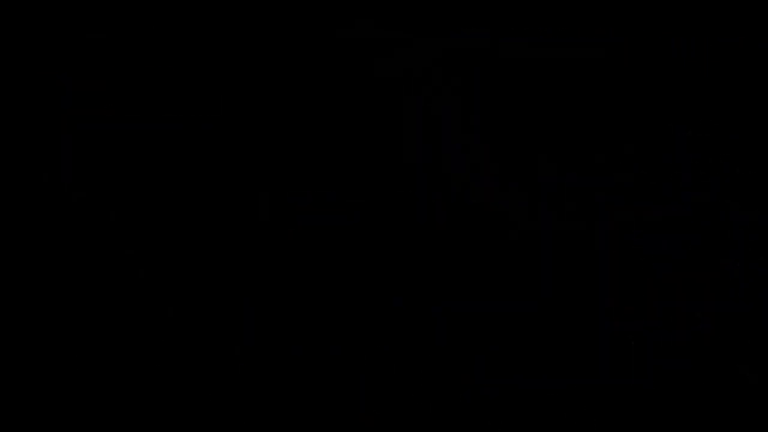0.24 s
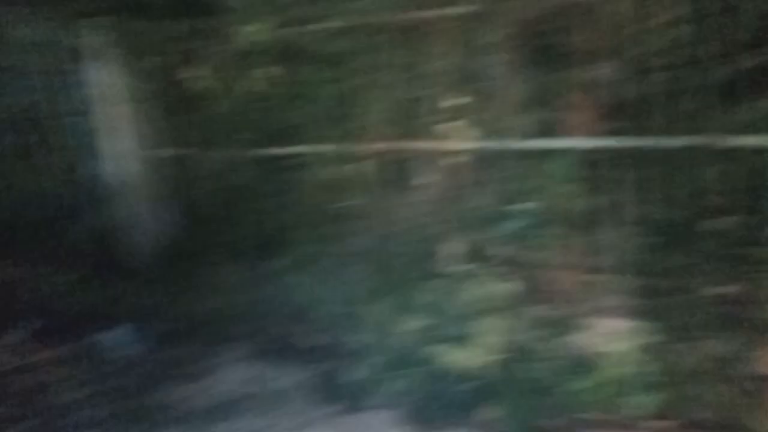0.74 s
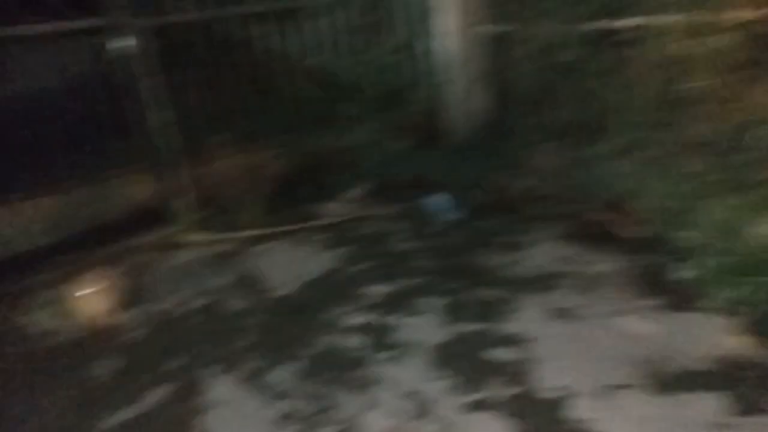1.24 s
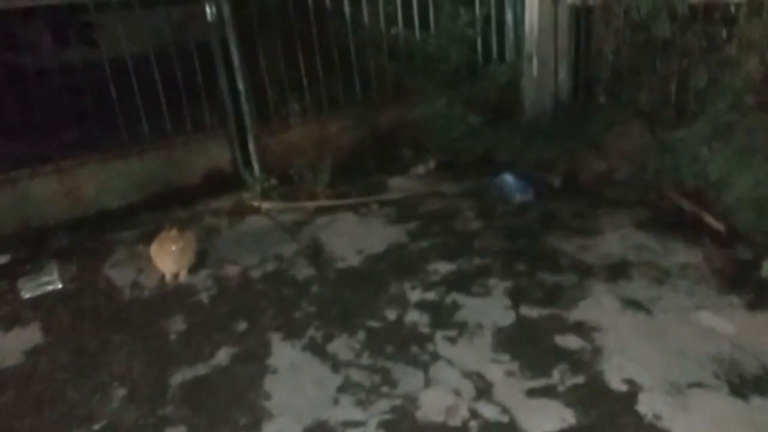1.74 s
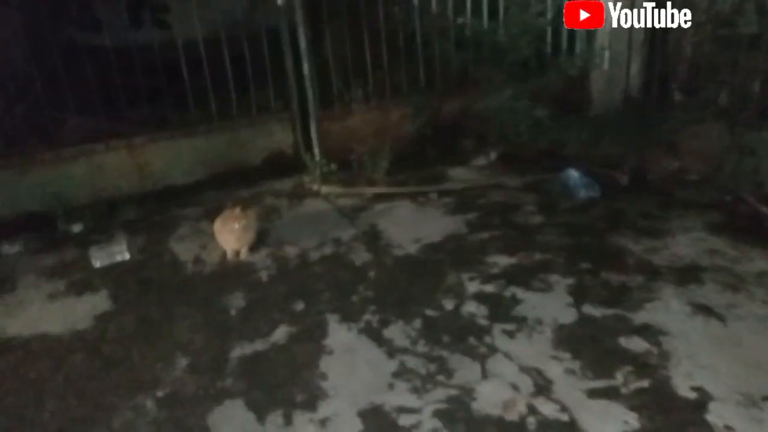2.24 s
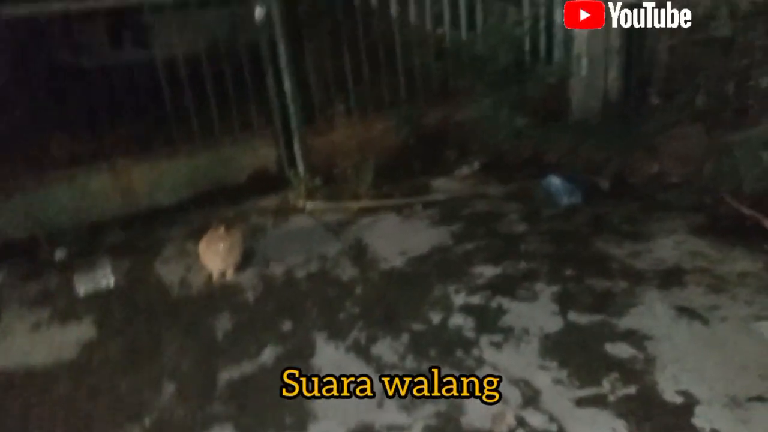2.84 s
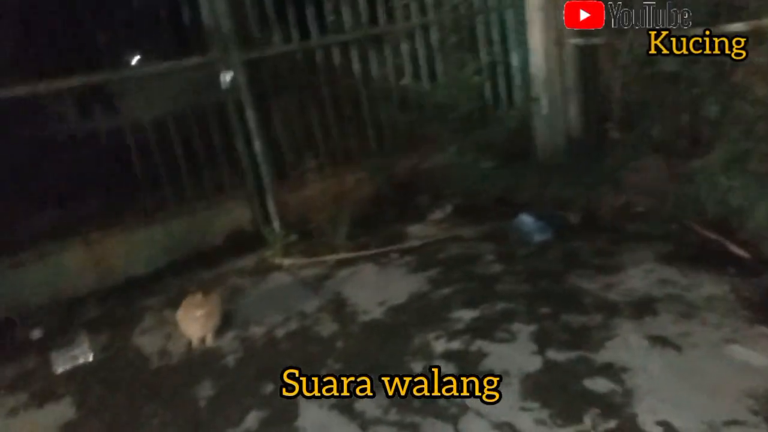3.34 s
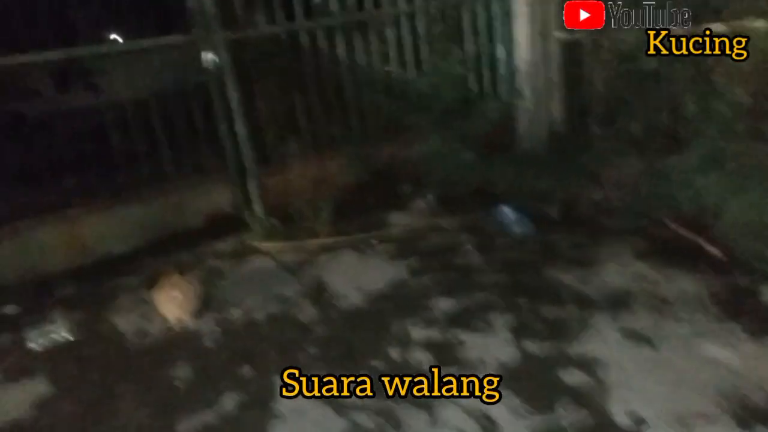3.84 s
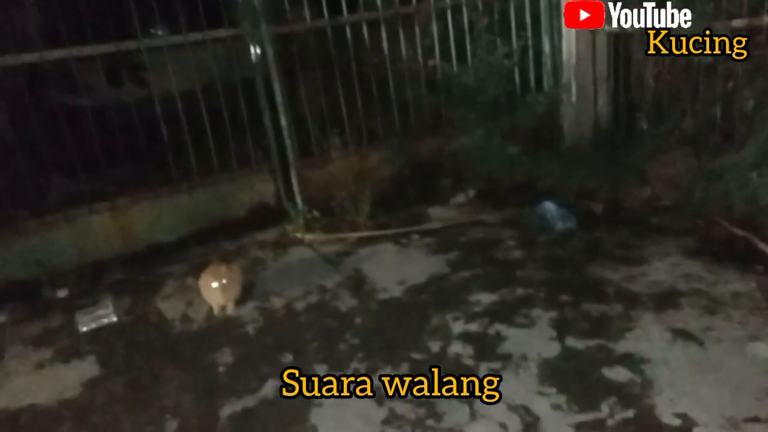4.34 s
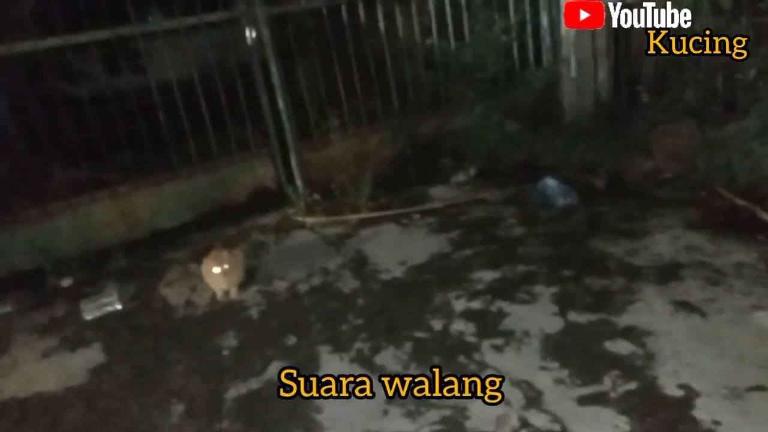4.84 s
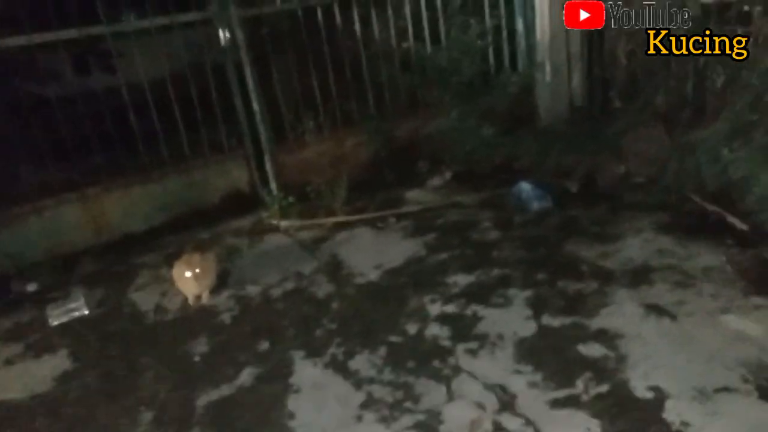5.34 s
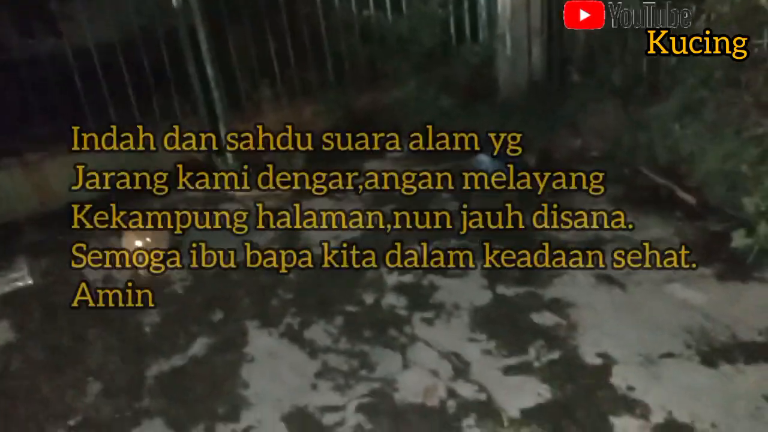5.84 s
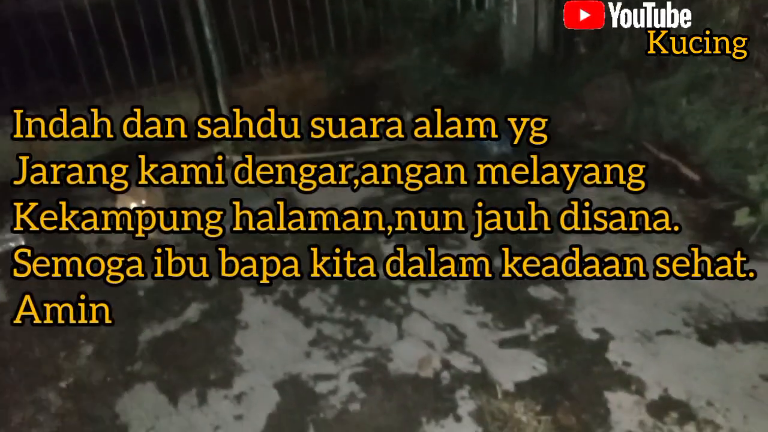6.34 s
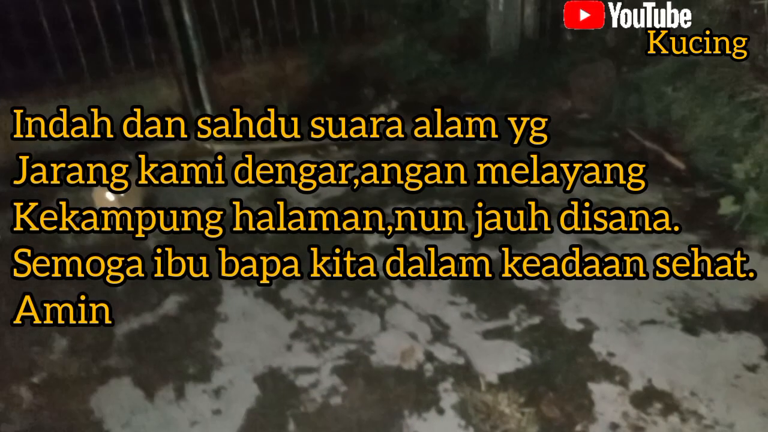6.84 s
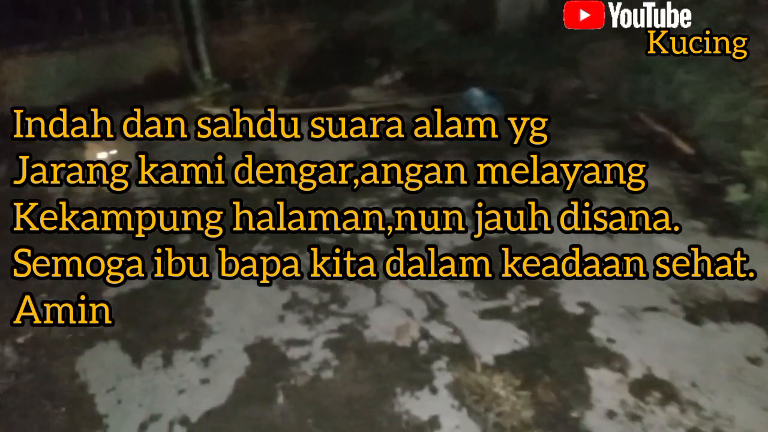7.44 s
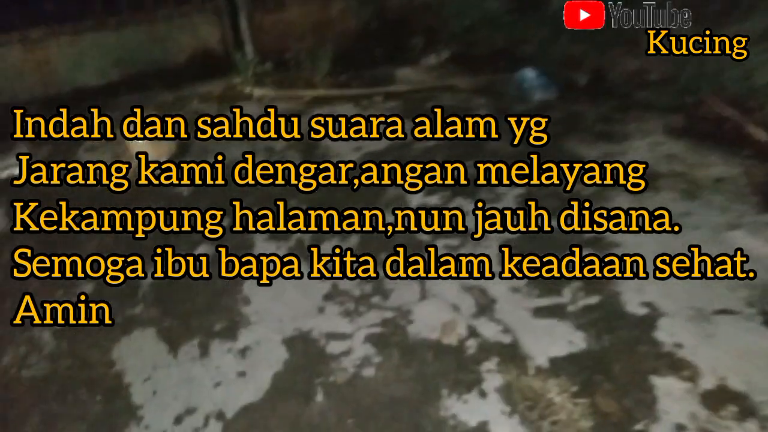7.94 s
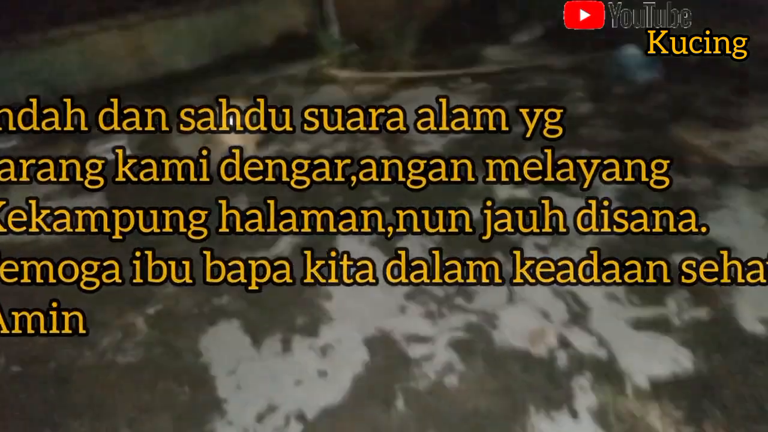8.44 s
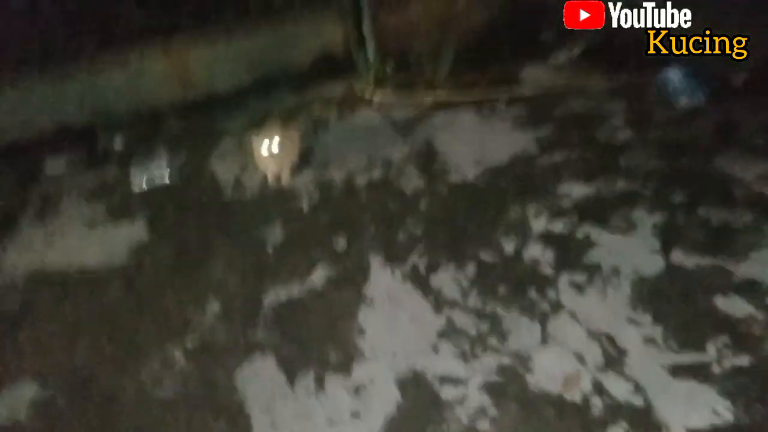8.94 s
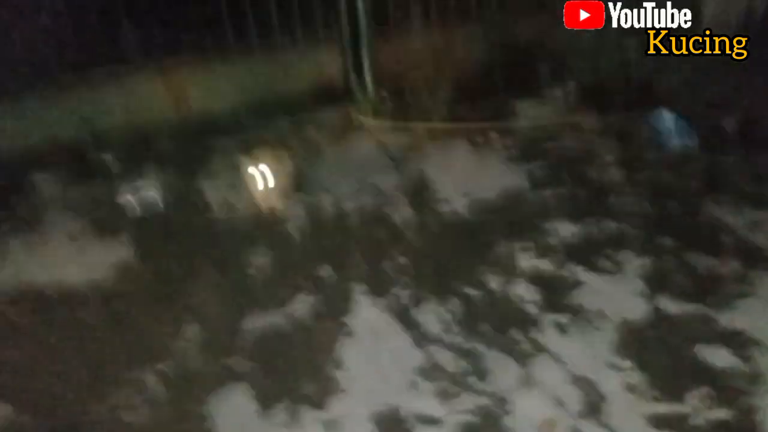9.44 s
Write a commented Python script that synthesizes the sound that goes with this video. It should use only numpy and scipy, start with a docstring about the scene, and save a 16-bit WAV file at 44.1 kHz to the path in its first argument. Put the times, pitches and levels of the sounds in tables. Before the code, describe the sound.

A night cricket chirps rapidly in an echoing yard while a nearby small engine idles, clicks off and coasts to silence, leaving soft knocks.

```python
"""A cricket in a yard at night chirps nearly five times a second, a few wing strokes to a chirp, echoing off walls.
Each stroke drags a scraper over a file of teeth, and every tooth rings the wing; friction adds a hiss.
A single-cylinder engine idles nearby in low puffs and rattling metal, is switched off with a click and
coasts to a stop after a few slower puffs. Then only the cricket, a few light knocks (ringing modes and a crack
of noise), faint ticks of noise, a high fizz and a distant murmur and rumble of coloured noise remain."""
import sys
import numpy as np
from scipy import signal
from scipy.fft import rfft, irfft, next_fast_len
from scipy.io import wavfile
from scipy.ndimage import uniform_filter1d, map_coordinates

SR = 44100
rng = np.random.default_rng(int(sys.argv[2]) if len(sys.argv) > 2 else 0)


def materialize(psi):
    """Save the field psi as 16-bit PCM at rate SR to the path in sys.argv[1].

    A 1-D psi becomes a single channel; in a 2-D psi each row is a channel.
    """
    bounded = np.clip(np.atleast_2d(psi).T, -1, 1)
    quanta = np.round(bounded * 32767).astype(np.int16)
    wavfile.write(sys.argv[1], SR, quanta)


N = 427329

# Loudness of the cricket through the night. Each row: time in seconds, level in dB before each sound's own offset.
CRICKET_LOUDNESS = [(.42, -35), (.63, -28.5), (1.6, -25), (2.35, -28), (2.79, -29), (3.0, -24),
                    (5.0, -23.5), (7.3, -23), (7.8, -24.5), (8.6, -23.5), (9.69, -23.2)]

SWITCH_OFF_S, STANDSTILL_S = 2.494, 3.05  # the engine is cut, the engine gives its last sound


def amp(db):
    """Decibels to gain."""
    return 10 ** (np.asarray(db) / 20)


def unit(x):
    """Scale to rms 1."""
    return x / np.sqrt(np.mean(x ** 2) + 1e-20)


def along(points, hz):
    """Interpolate (Hz, value) points on a log frequency axis."""
    f, v = np.transpose(points)
    return np.interp(np.log(hz + 1), np.log(f + 1), v)


def curve(rows):
    """One value per sample from (seconds, value) rows."""
    return np.interp(np.arange(N) / SR, *np.transpose(rows))


def wobble(rate):
    """A smooth random curve with rate knots a second."""
    knots = rng.standard_normal(int(N * rate / SR) + 4)
    return map_coordinates(knots, [np.arange(N) * rate / SR])


def filtered(x, response):
    """Apply a gain that is a function of frequency."""
    m = next_fast_len(N + SR // 2)
    return irfft(rfft(x, m) * response(np.fft.rfftfreq(m, 1 / SR)), m)[:N]


def noise(spectrum):
    """Noise of rms 1 with the given colour."""
    return unit(filtered(rng.standard_normal(N), lambda hz: amp(along(spectrum, hz))))


def impulse(spectrum, size=1024):
    """Minimum-phase impulse response with the given colour, by folding the cepstrum onto positive time."""
    cepstrum = irfft(np.log(amp(along(spectrum, np.fft.rfftfreq(size, 1 / SR)))))
    cepstrum[1:size // 2] *= 2
    cepstrum[size // 2 + 1:] = 0
    return irfft(np.exp(rfft(cepstrum)))


def add(track, s, sound):
    """Mix a sound into the track at time s in seconds."""
    i = int(np.clip(round(s * SR), 0, N))
    track[i:i + len(sound)] += sound[:N - i]


def night(rumble_db=1.5, murmur_db=2.1, rustle_octaves=0.85, swell_db=2.0, crackle_db=3.5):
    """A distant murmur and rumble of coloured noise, with soft, crackly rustles swelling over it."""
    # Colours of the two distant noises. Each row: frequency in Hz, relative density in dB per Hz.
    rumble_colour = [(15, -64), (25, -49), (35, -78), (45, -12), (86, -5), (124, 1.5), (167, -3.5),
                     (320, -11.5), (350, -13.5), (460, -21), (770, -120)]
    murmur_colour = [(150, -2), (280, 1), (450, -1), (800, -2), (1200, -10), (2000, -11), (3500, -16),
                     (5000, -27.5), (9000, -45), (15500, -34)]
    # Their slow rise and fall. Each row: time in seconds, level in dB before the offset above.
    rumble_level = [(2.8, -51.5), (4.6, -52.5), (5.5, -48.5), (6.7, -50.5), (7.0, -46), (8.35, -50.5),
                    (8.65, -43), (9.2, -47.5), (9.69, -48)]
    murmur_level = [(2.8, -54.5), (3.6, -52), (6.75, -52), (6.95, -49.5), (7.55, -50.3), (8.1, -48),
                    (8.5, -51), (9.69, -49)]
    # Soft swells of rustling. Each row: peak time in seconds, 1/e half-width in seconds, level in dB, centre in Hz.
    rustles = [(5.55, 0.29, -52, 2705), (5.94, 0.043, -48, 687), (6.86, 0.055, -47, 606),
               (8.13, 0.52, -48.5, 1600), (8.3, 0.48, -55, 3170), (9.3, 1, -55.5, 1350)]
    t = np.arange(N) / SR
    out = amp(curve(rumble_level) + rumble_db + 1.35 * wobble(11)) * noise(rumble_colour)
    out += amp(curve(murmur_level) + murmur_db + 0.52 * wobble(12)) * noise(murmur_colour)
    for s, width, db, centre in rustles:
        def band(hz):
            return np.exp(-(np.log2((hz + 1) / centre) / rustle_octaves) ** 2)

        rustle = unit(filtered(rng.standard_normal(N), band))
        swell = np.exp(-((t - s) / width) ** 2)
        out += amp(db + swell_db * wobble(35) + crackle_db * wobble(260)) * swell * rustle
    return out


def fizz(flicker_db=4, drift_db=2):
    """A faint, high hiss whose level flickers quickly and drifts more slowly."""
    # Loudness of the fizz. Each row: time in seconds, level in dB around which it flickers.
    fizz_level = [(.6, -72.5), (2.45, -66), (2.85, -74), (3.46, -53), (3.99, -52), (4.35, -61.5),
                  (5.1, -53), (5.69, -56), (6.1, -64), (6.95, -60), (7.75, -61), (8.15, -57), (9.69, -66)]
    colour = [(3000, -27), (6000, -8), (10000, -4), (12500, -4), (15000, 3)]  # Hz, relative dB
    return amp(curve(fizz_level) + flicker_db * wobble(240) + drift_db * wobble(28)) * noise(colour)


def ticks(level_db=-5, t60=0.0145, faint_db=-54, count=150):
    """Tiny dry bursts of dying noise: a few clear ones, and many faint ones once the engine has stopped."""
    # The clear ticks. Each row: start in seconds, level in dB before the common offset level_db.
    clear = [(2.4964, -33), (3.8157, -40), (4.4134, -33), (5.0904, -32), (5.1118, -36.5), (6.8369, -35),
             (8.3584, -43.5), (9.183, -33.5)]
    out, t = np.zeros(N), np.arange(SR // 30) / SR
    faint_times = rng.uniform(STANDSTILL_S, N / SR, count)
    faint = np.column_stack([faint_times, rng.normal(faint_db, 3, count)])
    for s, db in [*clear, *faint]:
        add(out, s, amp(db + level_db - 60 * t / t60) * rng.standard_normal(len(t)))
    return out


def knocks(level_db=-8, crack_db=-3, crack_t60=0.06, tilt=0.71):
    """Light blows and clicks: a hollow object rings in its modes under a crack of noise, brighter or duller."""
    # The blows. Each row: start in seconds, level in dB before level_db, treble balance in dB before the tilt.
    blows = [(2.494, -23.5, 5), (5.887, -37.5, -7), (5.985, -32.5, -19), (6.425, -39.5, -13),
             (6.814, -32.5, -18), (6.843, -27.5, -24), (6.901, -17.5, -20.5), (6.92, -23, -36),
             (7.057, -23.5, -16.5), (7.182, -23.5, 7), (8.108, -25.5, 13), (8.146, -31, 2),
             (9.188, -33, -28)]
    # Modes of the hollow object. Each row: nominal frequency in Hz, relative level in dB, decay time t60 in seconds.
    modes = [(393, -8.5, 0.052), (565, 1, 0.059), (670, -1, 0.085), (826, 0, 0.047), (1102, -5, 0.045),
             (1320, -11.5, 0.057), (1843, -14, 0.043), (2080, -35, 0.061)]
    contact_colour = [(150, -19), (450, -8.5), (2000, -3), (3200, -11), (9000, -41)]  # Hz, relative dB
    out, t = np.zeros(N), np.arange(SR // 5) / SR
    for s, db, treble_db in blows:
        def brightness_db(hz):
            octaves = np.log2(np.clip(hz, 500, 2000) / 700)
            return tilt * (treble_db + 5.5) * octaves

        ring = np.zeros(len(t))
        for hz, mode_db, t60 in modes:
            start_db = mode_db + rng.normal(0, 2.5) + brightness_db(hz)
            turns = hz * rng.normal(1, 0.038) * t + rng.random()
            ring += amp(start_db - 60 * t / t60) * np.sin(2 * np.pi * turns)
        contact = impulse([(hz, mode_db + brightness_db(hz)) for hz, mode_db in contact_colour])
        crack = unit(signal.lfilter(contact, 1, rng.standard_normal(len(t))))
        crack = crack * amp(crack_db - 60 * t / crack_t60)
        blow = (ring + crack) * (1 - np.exp(-t / 0.00085))  # soft onset
        add(out, s, amp(db + level_db) * blow / np.std(blow[:SR // 100]))
    return out


def engine_speed(t, coast_s=.365):
    """Speed as a share of idle: steady until the switch-off, then dying away exponentially."""
    return np.exp(-np.maximum(t - SWITCH_OFF_S, 0) / coast_s)


def engine_db(t, speed_db=15):
    """The engine grows quieter as it slows, by speed_db in the limit of zero speed."""
    # Loudness of the idling engine. Each row: time in seconds, level in dB before slowing and each part's offset.
    idle_level = [(.4, -34), (.58, -24), (1.2, -21), (2.5, -22)]
    return np.interp(t, *np.transpose(idle_level)) - speed_db * (1 - engine_speed(t))


def puff_times(first_puff_s=.4885, idle_cycle_s=.1032):
    """One puff each time the engine completes a cycle, so the puffs spread out as it slows."""
    t = np.arange(first_puff_s, STANDSTILL_S, 1 / SR)
    cycles = np.cumsum(engine_speed(t)) / SR / idle_cycle_s
    return np.interp(np.arange(cycles[-1]), cycles, t)


def exhaust(scatter_db=0.7, width_cycles=0.82, pipe_hz=138, pipe_db=-8, pipe_t60=0.17, overtone_db=-17):
    """Each puff is a short low swing of air that leaves the silencer ringing."""
    puff_hz, sag_hz, scatter_hz = 99, 16, 3.6  # pitch at idle, its fall toward zero speed, its spread
    out, t = np.zeros(N), np.arange(-SR // 25, SR // 7) / SR
    for s in puff_times():
        hz = puff_hz - sag_hz * (1 - engine_speed(s)) + scatter_hz * rng.normal()
        turn = 2 * np.pi * hz * t
        swing = np.sin(turn) + amp(overtone_db) * np.sin(2 * turn)
        puff = np.exp(-(hz * t / width_cycles) ** 2) * swing
        after = np.maximum(t - 1 / hz, 0)  # the ringing starts one period after the middle of the puff
        ring = amp(pipe_db - 60 * after / pipe_t60) * np.sin(2 * np.pi * pipe_hz * after)
        add(out, s + t[0], amp(engine_db(s) + scatter_db * rng.normal()) * (puff + ring))
    return out


def clatter(level_db=-22.0, contact_db=3, contact_decay=0.013, hiss_db=-17, scatter_db=3.5):
    """The engine's moving parts rattle at fixed points of each cycle, and fall silent with the last turns."""
    # Colour of the metal casing. Each row: frequency in Hz, relative density in dB per Hz.
    casing = [(120, -3.5), (200, -0.5), (253, -4), (409, -4), (487, -1), (528, -8.5), (628, -1),
              (740, -10.5), (1210, -13), (2140, -19), (2300, -32.5), (2990, -54), (5060, -120)]
    # Valve gear contacts in each cycle. Each row: delay from the puff in seconds, relative level in dB.
    contacts = [(-.023, -0.5), (-.011, 0), (-.002, -1.5), (.015, 0), (.042, -2.5), (.053, -11)]
    hiss_colour = [(1500, -17.5), (2500, 3.0), (4000, -11), (7000, -26), (12000, -32)]  # Hz, relative dB
    t = np.arange(N) / SR
    blows = np.zeros(N)
    decay = np.exp(-np.arange(SR // 10) / SR / contact_decay)
    for s in puff_times():
        for delay, db in contacts:
            add(blows, s + delay, amp(db + contact_db + scatter_db * rng.normal()) * decay)
    running = np.interp(t, [SWITCH_OFF_S, STANDSTILL_S], [1, 0])
    metal = noise(casing) + amp(hiss_db) * noise(hiss_colour)
    level = amp(engine_db(t) + level_db + 0.8 * wobble(24.84))
    return running * level * np.hypot(1, blows) * metal  # a steady rustle of metal under the blows


def chirp_times():
    """Chirps follow each other evenly within each stretch; the pace shifts slightly between stretches."""
    # Pace of the cricket. Each row: first chirp of the stretch in seconds, gap between chirps in seconds.
    pace = [(0.413, 0.21725), (3.004, 0.22), (3.909, .2155), (5.202, 0.21), (6.048, .2162), (9.065, 0.208)]
    ends = [s for s, _ in pace[1:]] + [N / SR + pace[-1][1]]
    stretches = [np.arange(s, end - gap / 2, gap) for (s, gap), end in zip(pace, ends)]
    return np.concatenate(stretches)


def scrape(level_db=-18.0, lag=0.0046, width=0.042):
    """Friction of the scraper on the file: a rough hiss that swells and fades with each chirp."""
    # Colour of the friction. Each row: frequency in Hz, relative density in dB per Hz.
    friction = [(1900, -28), (2500, 3), (3450, 3.5), (4100, -6.5), (4900, -11.5), (5600, -9.5),
                (6500, -6.5), (7800, 7.5), (9200, 8), (10200, -40.5), (12200, -13), (13800, -13),
                (15500, 1)]
    t = np.arange(-SR // 8, SR // 8) / SR
    pressure = np.zeros(N)
    for s in chirp_times():
        add(pressure, s + lag + t[0], np.exp(-(t / width) ** 2))
    return pressure * amp(curve(CRICKET_LOUDNESS) + level_db + 3.9 * wobble(250)) * noise(friction)


def stroke(wing, tooth_hz, glide, jitter, rough_db, slide_db, rise, fall, count=62):
    """The scraper slides in lightly, speeds up, bites into the file and lets go; each tooth rings the wing.
    Returns the time to the loudest point, and the sound scaled to it."""
    place = np.linspace(-1, 1, count)  # position of each tooth along the file
    rate = tooth_hz * rng.normal(1, 0.014) * (1 + glide * place)
    when = np.cumsum((1 + jitter * rng.standard_normal(count)) / rate)
    bite = when[count // 2]
    distance = np.abs(when - bite)
    sliding_in = np.maximum(amp(slide_db), np.exp(-distance / rise))
    grip = np.where(when < bite, sliding_in, np.exp(-distance / fall))
    force = grip * amp(rough_db * rng.standard_normal(count))
    strikes = np.sinc(np.arange(SR // 32) - when[:, None] * SR)  # places each strike between samples
    sound = signal.fftconvolve(force @ strikes, wing)
    power = uniform_filter1d(sound ** 2, SR // 100)
    return power.argmax() / SR, sound / np.sqrt(power.max())


def cricket():
    """Each chirp builds from a faint touch and a slow, scratchy stroke of the wings to three full ones."""
    # Sound radiated by the wings for one tooth strike. Each row: frequency in Hz, relative level in dB.
    wing_colour = [(1800, -42), (2400, -13), (2660, -13), (2780, -6.5), (2950, -15.5), (3500, -12),
                   (4800, -26.5), (5300, -30), (5600, -23.5), (6300, -28.5), (7600, -18), (8400, 4),
                   (9100, -7), (10000, -23), (12200, -39), (13900, -27), (15600, -26)]
    # Light strokes leading into a chirp. Each row: nominal delay from the chirp's time in seconds, relative dB.
    lead_in = [(-.04, -24.5), (-.022, -12)]
    # Full strokes of a chirp. Each row: nominal delay from the chirp's time in seconds, relative level in dB.
    full_strokes = [(-.002, -3), (.019, -2), (.04, -4.5)]
    chirp_scatter_s, stroke_scatter_s = .002, .002  # timing slack of a whole chirp and of one stroke
    spread_scatter = .11  # some chirps are drawn out, others hurried
    effort_scatter_db, lead_scatter_db, stroke_scatter_db = 0.53, 3.5, 1.5
    lead_tooth_hz, full_tooth_hz = 2520, 2711  # teeth struck per second, before each stroke's own variation
    rise_hz_per_s = 1000  # the wings move faster as the chirp goes on
    out, wing, starts = np.zeros(N), impulse(wing_colour), chirp_times()
    for s, (slack, spread, effort) in zip(starts, rng.standard_normal((len(starts), 3))):
        chirp_db = np.interp(s, *np.transpose(CRICKET_LOUDNESS)) + effort_scatter_db * effort

        def when(delay):
            chirp_s = s + chirp_scatter_s * slack
            return chirp_s + delay * (1 + spread_scatter * spread) + stroke_scatter_s * rng.normal()

        for delay, db in lead_in:
            peak_s, sound = stroke(wing, tooth_hz=lead_tooth_hz, glide=.06, jitter=.09, rough_db=3.5,
                                   slide_db=-15.5, rise=0.0016, fall=0.016, count=70)
            add(out, when(delay) - peak_s, amp(chirp_db + db + lead_scatter_db * rng.normal()) * sound)
        for delay, db in full_strokes:
            tooth_hz = full_tooth_hz + rise_hz_per_s * delay
            peak_s, sound = stroke(wing, tooth_hz=tooth_hz, glide=.06, jitter=.056, rough_db=3.0,
                                   slide_db=-7, rise=.002, fall=.009)
            add(out, when(delay) - peak_s, amp(chirp_db + db + stroke_scatter_db * rng.normal()) * sound)
    return out


def yard(x, delay=.008, count=24):
    """Walls and foliage scatter the sound; the pattern of echoes drifts as the microphone moves."""
    # How long the yard rings. Each row: frequency in Hz, decay time t60 in seconds.
    yard_t60 = [(150, 0.18), (1000, 0.38), (2800, 0.42), (8400, 0.42), (11000, 0.37), (15000, 0.16)]
    out, place = np.zeros(N), np.linspace(0, count - 1, N)
    for k in range(count):
        hz, t, bins = signal.stft(rng.standard_normal(SR // 2), SR, nperseg=256)
        decay = amp(-60 * t / along(yard_t60, hz)[:, None])
        tail = signal.istft(bins * decay, SR, nperseg=256)[1]
        near = np.flatnonzero(np.abs(place - k) < 1)
        part = x[near] * np.cos(np.pi / 2 * (place[near] - k))  # crossfade from one pattern to the next
        add(out, near[0] / SR + delay, signal.fftconvolve(part, tail / np.linalg.norm(tail)))
    return out


def scene(cricket_wet_db=-7, other_wet_db=-13):
    """Cricket, engine and small sounds with the echoes of the yard, over the night background and the fizz."""
    insect = cricket() + scrape()
    others = exhaust() + clatter() + knocks() + ticks()
    echo = yard(amp(cricket_wet_db) * insect + amp(other_wet_db) * others)
    return (insect + others + echo + night() + fizz())[None]


def record(dry, low_hz=44, top_hz=15750, start_s=.39):
    """The sound fades in from silence; the microphone loses the deepest bass and all above its band limit."""
    fade = np.interp(np.arange(N) / SR, [start_s, start_s + .004, start_s + .2], [0, .7, 1])

    def microphone(hz):
        return (hz < top_hz) * hz ** 3 / np.hypot(hz ** 3, low_hz ** 3)

    return filtered(dry[0] * fade, microphone)[None]


dry = scene()
out = record(dry)
materialize(out)
```